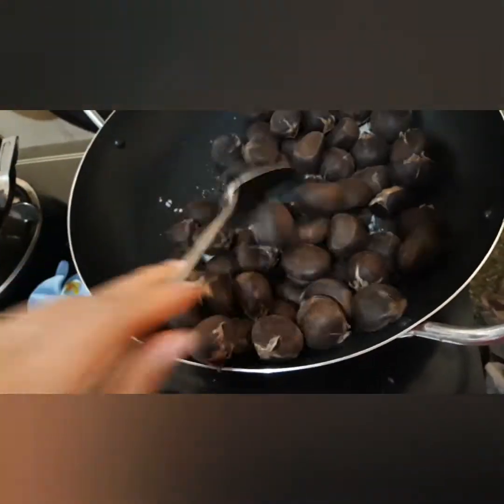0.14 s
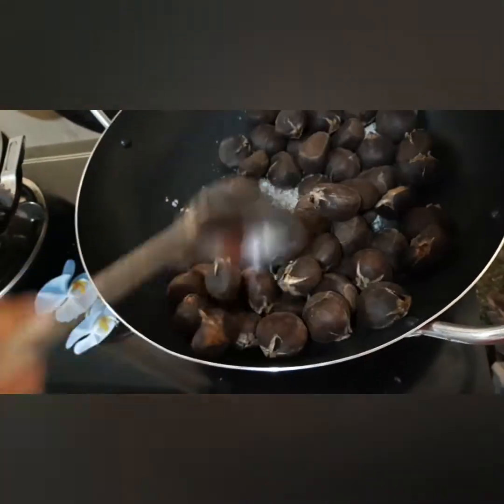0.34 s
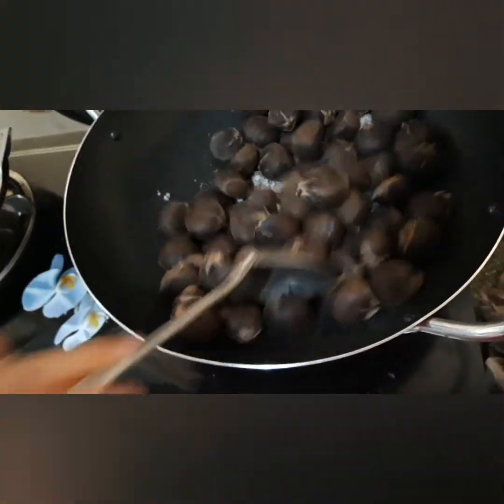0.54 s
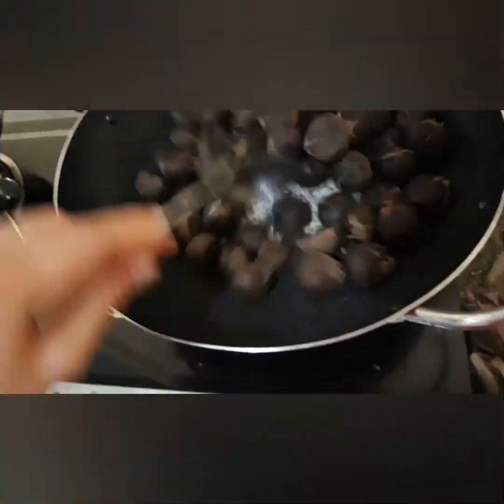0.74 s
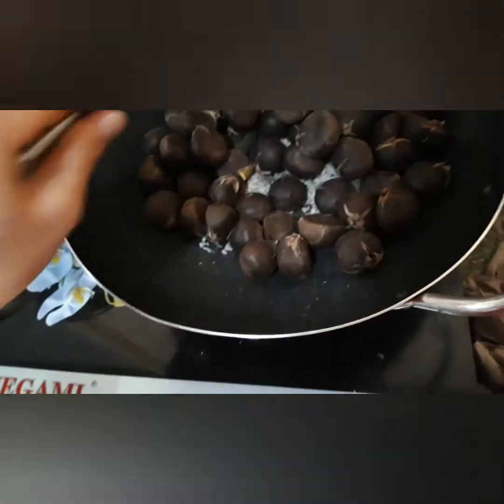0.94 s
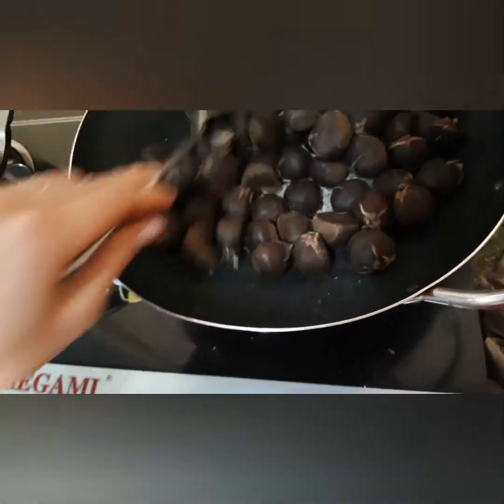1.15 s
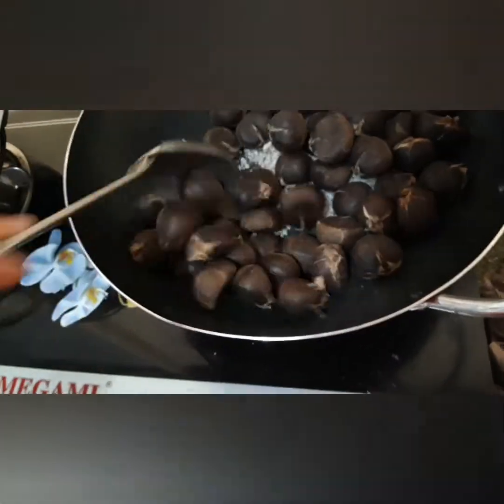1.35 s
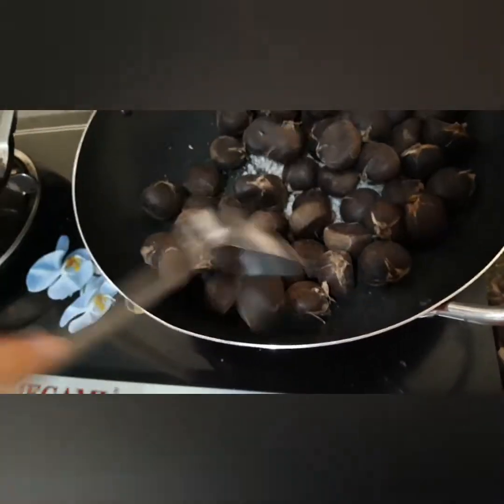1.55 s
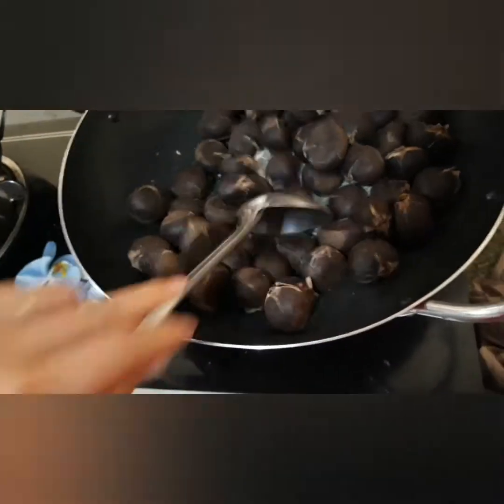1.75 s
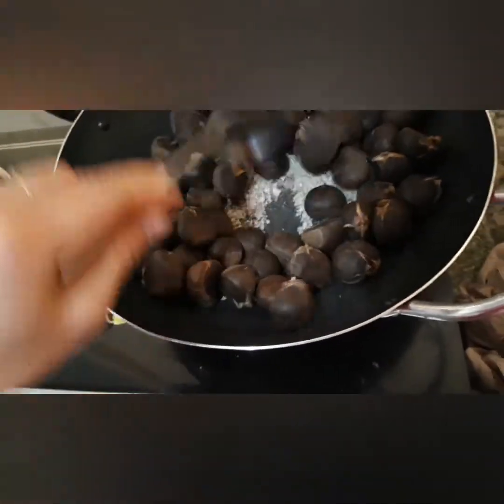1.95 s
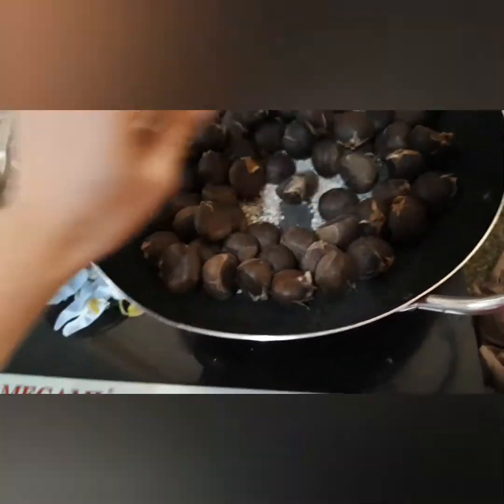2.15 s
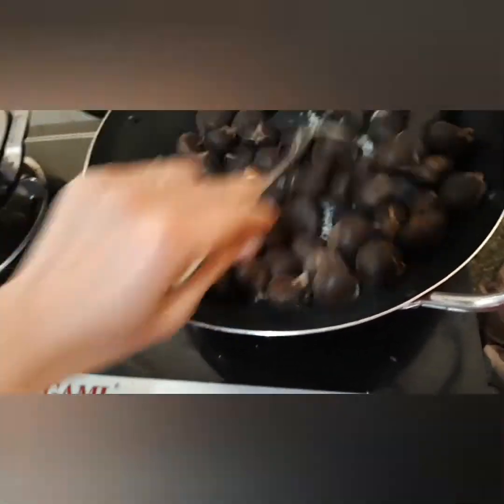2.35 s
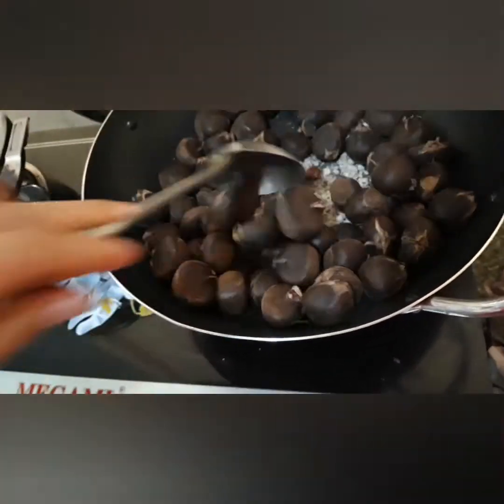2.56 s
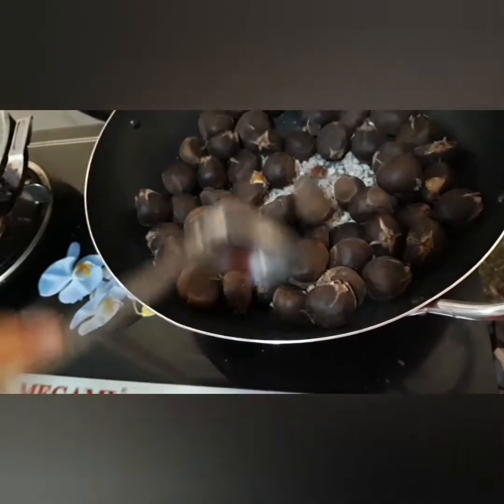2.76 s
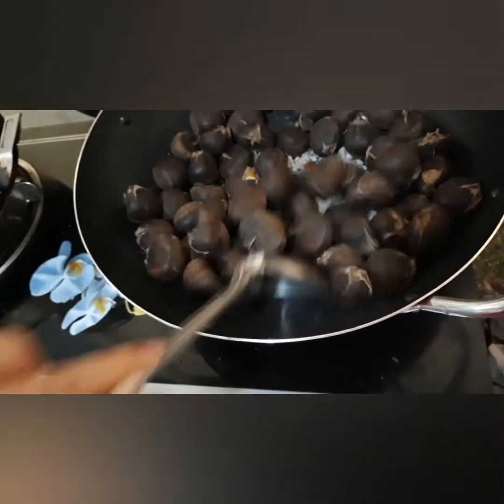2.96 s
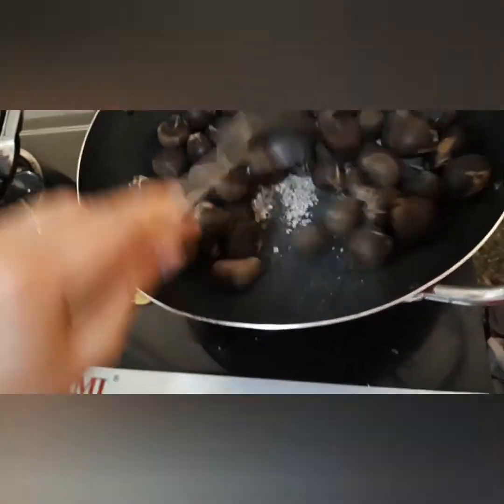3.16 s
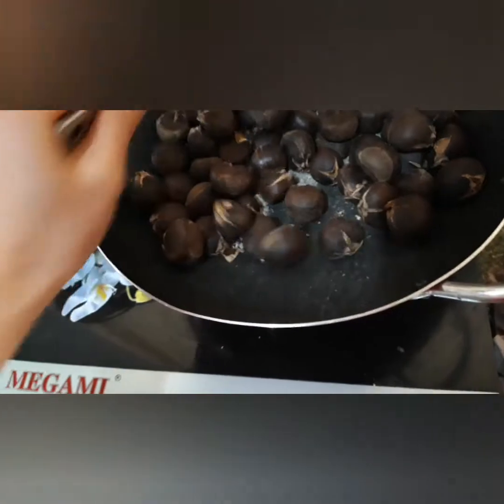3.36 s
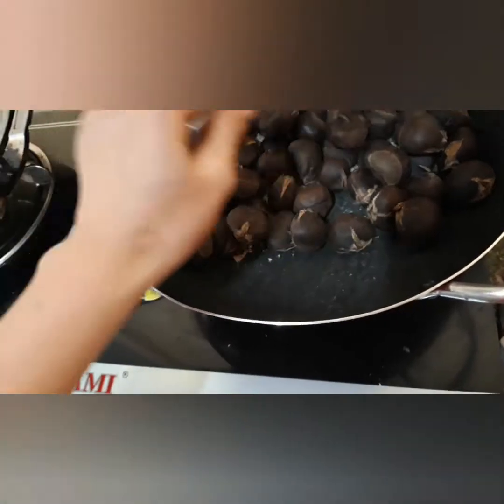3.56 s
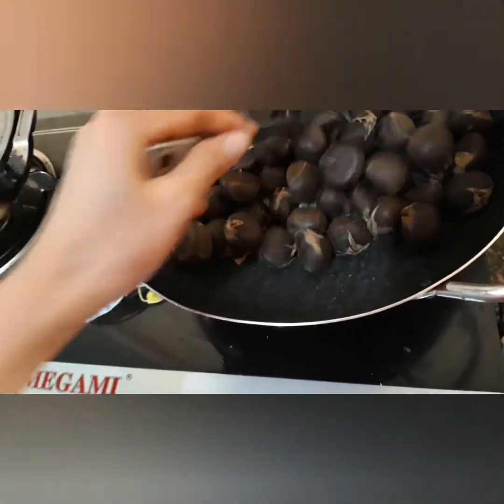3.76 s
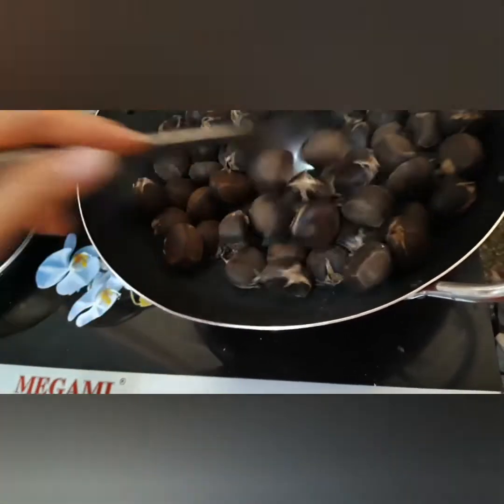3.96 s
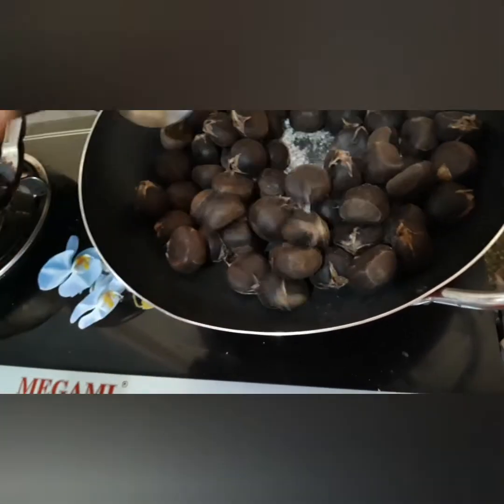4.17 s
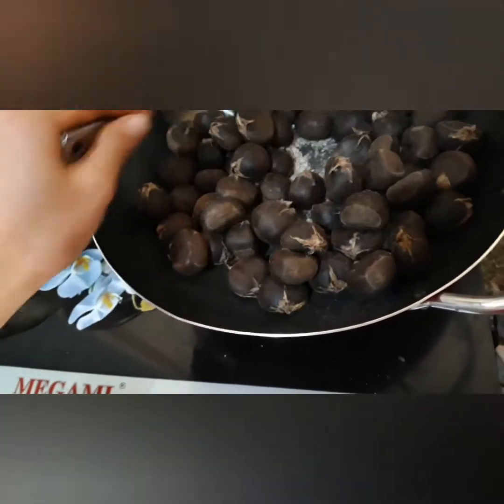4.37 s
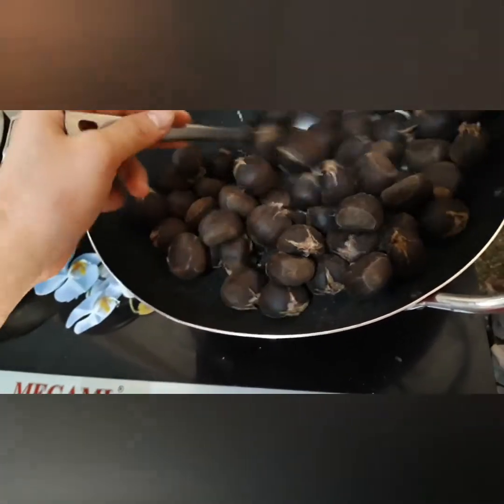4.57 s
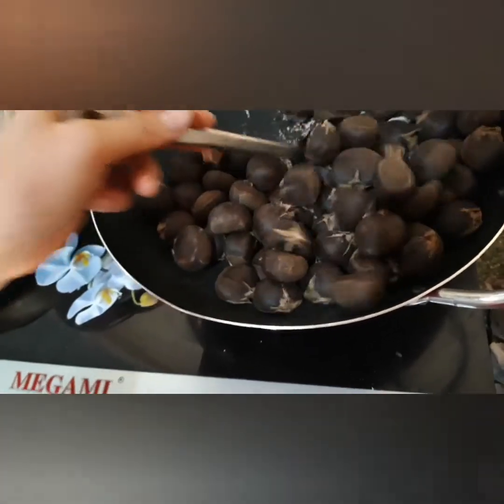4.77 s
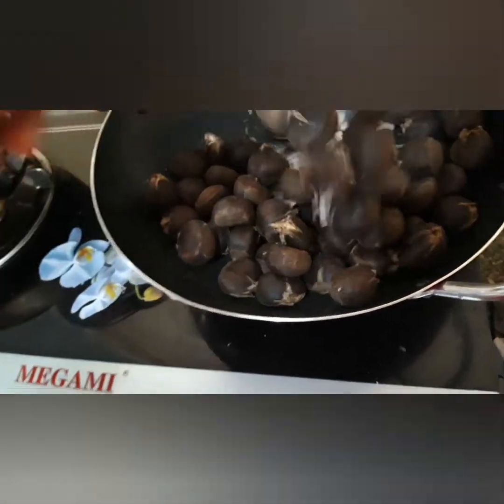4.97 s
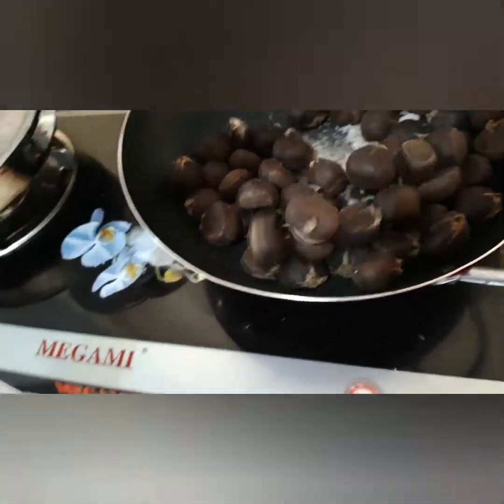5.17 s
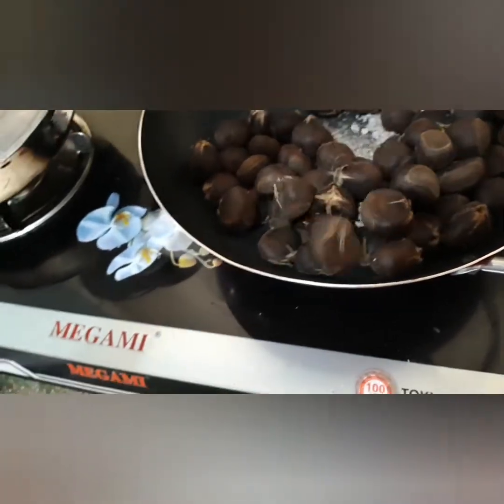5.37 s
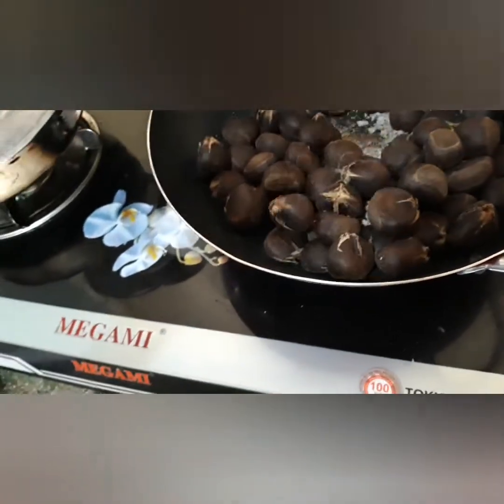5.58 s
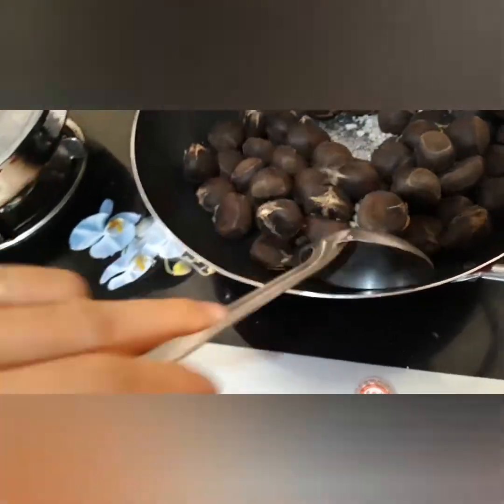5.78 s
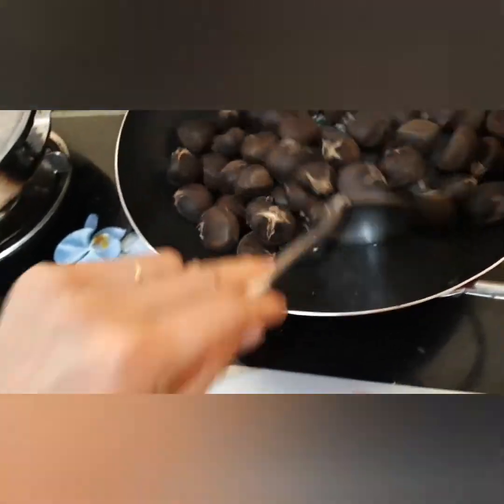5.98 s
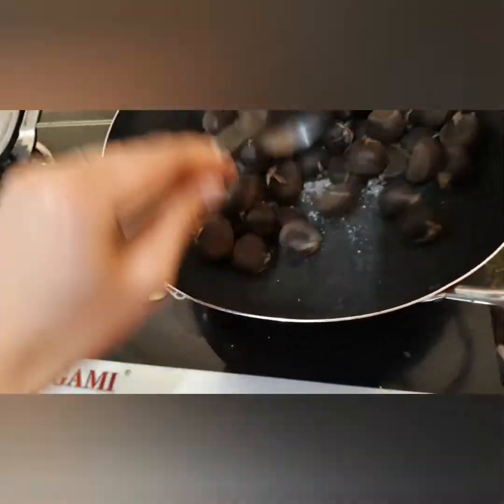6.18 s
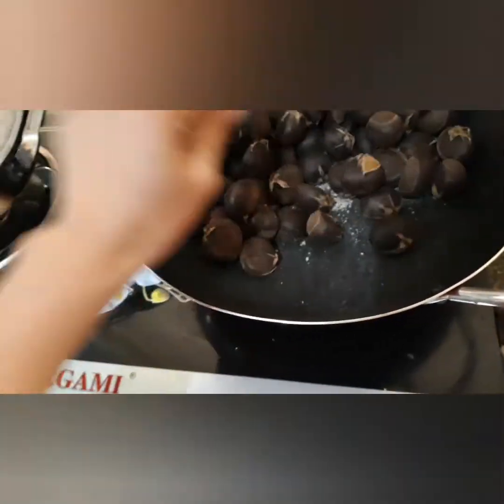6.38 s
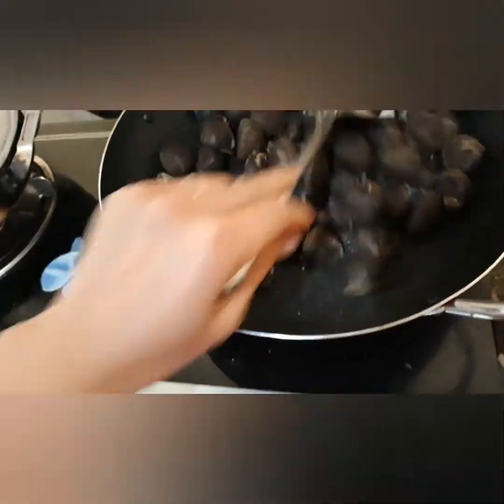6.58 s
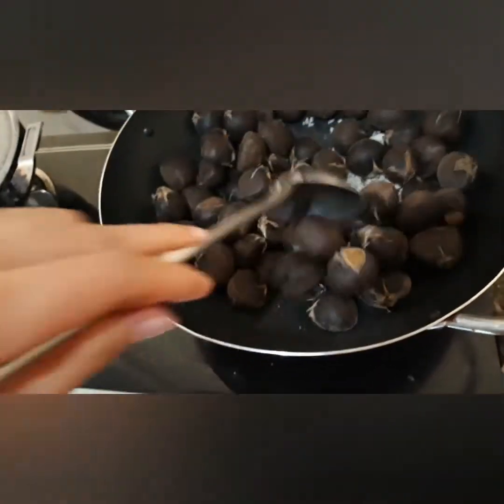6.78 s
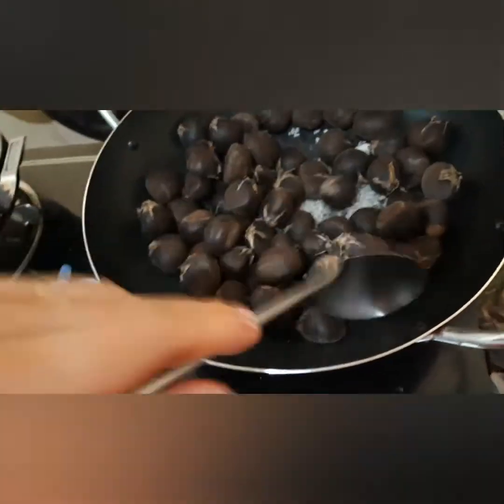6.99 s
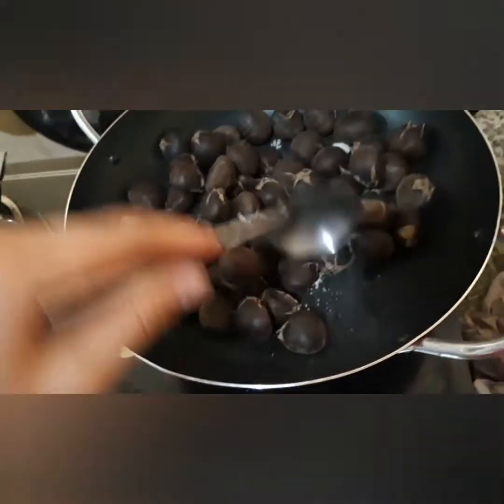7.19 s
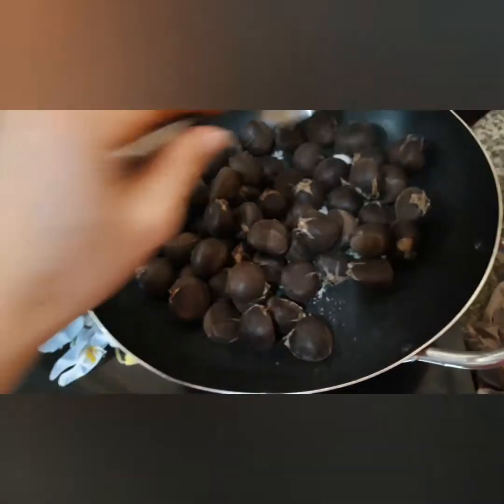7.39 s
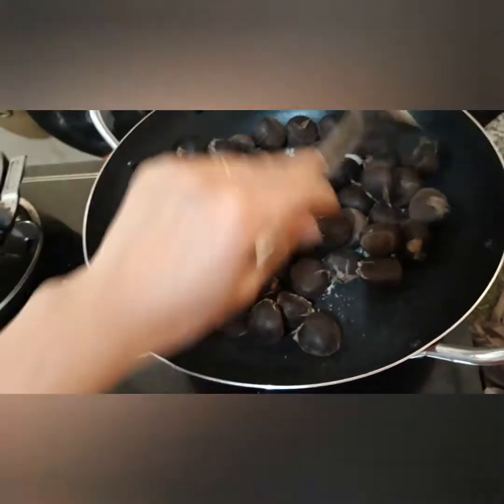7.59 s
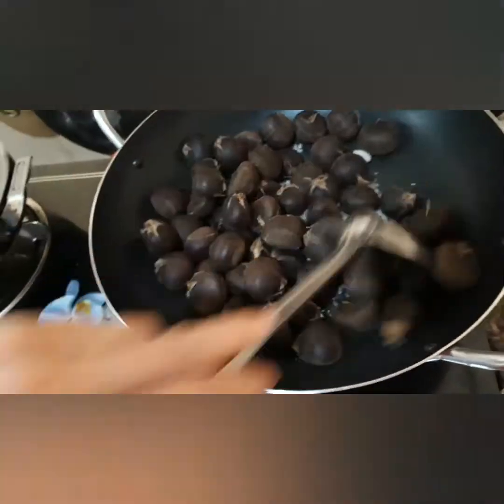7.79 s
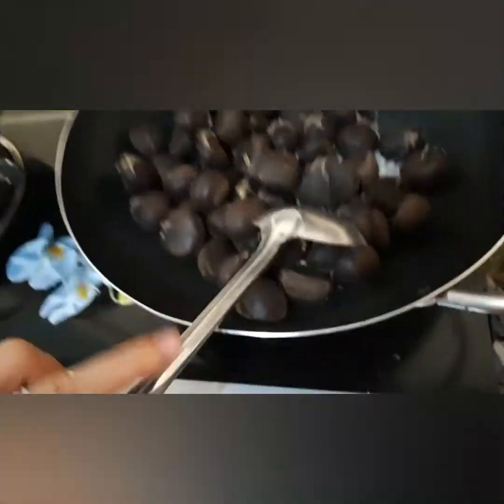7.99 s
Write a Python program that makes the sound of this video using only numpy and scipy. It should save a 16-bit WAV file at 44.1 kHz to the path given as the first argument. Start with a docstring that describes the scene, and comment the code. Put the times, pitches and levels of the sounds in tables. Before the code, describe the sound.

A metal ladle stirs chestnuts and coarse salt in a pan, with gritty scraping strokes, shell clicks, hollow knocks and occasional sharp metallic clangs.

```python
"""Stirring chestnuts in salt

Chestnuts and coarse salt are stirred with a steel ladle in a nonstick pan on a kitchen hob.
Each stroke grinds salt over the pan floor (many tiny random impacts) and sets the nuts tumbling.
Single nuts knock on the pan and shells click on the ladle (short filtered noise bursts).
Now and then the ladle strikes the pan, chatters and makes it ring (noise driving the pan's own tones).
Short squeaks, thin tings, a soft hum, room tone and a small kitchen's tail complete the sound."""
import sys
import numpy as np
from scipy import signal
from scipy.fft import rfft, irfft
from scipy.io import wavfile
from scipy.ndimage import uniform_filter1d

SR = 44100
rng = np.random.default_rng(int(sys.argv[2]) if len(sys.argv) > 2 else 0)


def pcm_store(signal):
    """Save signal as 16-bit PCM."""
    levels = np.round(np.clip(np.atleast_2d(signal), -1, 1) * 32767)
    wavfile.write(sys.argv[1], SR, levels.astype(np.int16).T)


N = 354823
TIME = np.arange(N) / SR
BLOW = TIME[:SR // 3]   # the time axis of one blow, a third of a second


def amp(db):
    """Decibels to gain."""
    return 10 ** (np.asarray(db) / 20)


def rms_one(x):
    """Scale to an average (rms) level of 1."""
    return x / np.sqrt(np.mean(x ** 2) + 1e-20)


def peak_one(x):
    """Scale so that the highest peak is 1."""
    return x / np.abs(x).max()


def add(out, start_s, x):
    """Mix x into out from start_s on."""
    at = max(round(start_s * SR), 0)
    out[at:at + len(x)] += x[:N - at]


def colour(x, spectrum):
    """Filter through the points (pitch_hz, level_db) without smearing sound ahead of time (minimum phase)."""
    size = 4096
    hz, db = np.transpose(spectrum)
    grid = np.maximum(np.fft.rfftfreq(size, 1 / SR), 1)
    gain = amp(np.interp(np.log(grid), np.log(hz), db))
    # folding the cepstrum (the spectrum of the log gain) gives the minimum-phase filter
    cepstrum = irfft(np.log(gain))[:size // 2]
    cepstrum[1:] *= 2
    impulse_response = irfft(np.exp(rfft(cepstrum, size)))
    return signal.fftconvolve(x, impulse_response)[:len(x)]


def resonance(x, hz, width_hz):
    """One resonance, with a gain of about 1 at its top; a wider one dies sooner."""
    r = np.exp(-np.pi * width_hz / SR)
    feed = np.array([1, 0, -1]) * (1 - r * r) / 2
    feedback = [1, -2 * r * np.cos(2 * np.pi * hz / SR), r * r]
    return signal.lfilter(feed, feedback, x)


def burst(t60, hold=0):
    """Noise for countless crowded modes: driven for hold seconds, then falling 60 dB in t60 seconds."""
    decay = amp(-60 * np.maximum(BLOW - hold, 0) / t60)
    return rng.standard_normal(len(BLOW)) * decay


def drift(rate, size=N):
    """Random wander with an rms of 1: straight lines between rate new values a second."""
    knots = rng.standard_normal(int(size / SR * rate) + 2)
    return rms_one(np.interp(TIME[:size] * rate, np.arange(len(knots)), knots))


def contacts(per_s, spread_db):
    """Random impacts of uneven size and either sign, per_s of them a second on average."""
    sizes = amp(spread_db * np.minimum(rng.exponential(1, N), 4))
    signs = rng.choice([-1, 1], N)
    return sizes * signs * (rng.random(N) < per_s / SR)


def scatter(impacts, t60, low_hz, high_hz, relative_width, count=18):
    """Impacts land on many spots, each with a short ring around a pitch of its own."""
    spot = rng.integers(0, count, N)
    out = 0
    for k, hz in enumerate(np.geomspace(low_hz, high_hz, count)):
        broad = rms_one(burst(t60))
        pitched = rms_one(resonance(burst(t60), hz, relative_width * hz))
        ring = pitched * np.sqrt(hz / high_hz) + .5 * broad
        out = out + signal.oaconvolve(impacts * (spot == k), ring)[:N]
    return out


def even(x, span_s):
    """Hold the level near 1 over span_s while the fine grain stays."""
    power = uniform_filter1d(x ** 2, int(span_s * SR))
    # the small added power keeps silences from being blown up
    return x / np.sqrt(np.maximum(power, 0) + np.mean(power) / 1000)


ARCH_DB = 3   # a push is this much weaker at its ends than in its middle
SETTLE_DB, SETTLE_DB_PER_S = -25, 20.5   # a slow trickle starts this far under the push, then fades


def push(start_s, length_s, attack_s, release_db_per_s):
    """Power of one stroke: it swells, arches over the push and dies away as the heap settles."""
    before = np.maximum(start_s - TIME, 0)
    after = np.maximum(TIME - start_s - length_s, 0)
    progress = np.clip((TIME - start_s) / length_s, 0, 1)
    arch = ARCH_DB * (2 * progress - 1) ** 2
    release = np.maximum(-release_db_per_s * after, SETTLE_DB - SETTLE_DB_PER_S * after)
    return amp(np.maximum(release - arch - 20 * before / attack_s, -200)) ** 2


# the ladle pushes through the heap: start_s (full push), length_s, salt_level_db,
# attack_s (time to swell by 20 dB), nuts_db (drive of the nuts above that of the salt)
STROKES = [(0.0, 0.0587, -21, .1, 0), (.55, 0.1707, -24.5, 0.1335, -1), (1.08, 0.1361, -21.5, 0.09, 4),
           (1.35, 0.106, -39.5, 0.01, 9.5), (1.75, 0.0867, -20, 0.1938, 4),
           (2.215, 0.1724, -26.5, 0.1419, 0), (2.85, 0.265, -27, 0.022, -3.5),
           (3.48, 0.354, -34.5, 0.4243, -2), (3.99, .19, -47, .1, 4), (4.37, 0.28, -28.5, 0.21, 0),
           (4.55, .025, -27, .03, -3), (4.83, 0.135, -40, 0.5, 2), (5.09, 0.1077, -41.5, 0.07, 0),
           (5.33, .2, -57, .1, 0), (5.74, .08, -27, .018, 2), (5.85, 0.18, -21.5, 0.055, 3),
           (6.46, 0.1936, -27.5, 0.2054, -1), (7.04, 0.0656, -24, 0.184, -0.5),
           (7.609, 0.2084, -26, 0.082, 6.5)]
RELEASE_DB_PER_S = 111.5   # the grinding dies away after the push
ROLL_ON_DB_PER_S = 85      # the nuts come to rest more slowly


def stirring():
    """How hard the salt and the nuts are moved by all strokes together, both in dB."""
    salt, nuts = 0, 0
    for start_s, length_s, db, attack_s, nuts_db in STROKES:
        salt = salt + amp(db) ** 2 * push(start_s, length_s, attack_s, RELEASE_DB_PER_S)
        nuts = nuts + amp(db + nuts_db) ** 2 * push(start_s, length_s, attack_s, ROLL_ON_DB_PER_S)
    return 10 * np.log10([salt, nuts])


# the tones (modes) the pan rings with: pitch_hz, level_db
PAN_MODES = [(316, -16), (803, -15), (966, -12), (1104, -11), (1424, -5), (1657, -5), (1960, -3),
             (2278, -2), (2665, 1), (2923, -4), (3160, -1), (3285, -2), (3631, 2), (4229, 0), (4641, 1),
             (4875, 4), (5315, 2), (5580, 0), (6140, 2), (6540, 0), (7300, -3)]
PRESSED_WIDTH_HZ = 45   # width of the pan's modes under the ladle


def pressed(x, wander_db=3.5, turns=9):
    """Pressed by the ladle, the pan's modes widen; which of them answer changes as the contact moves."""
    out = 0
    for hz, db in PAN_MODES:
        level = amp(db + wander_db * drift(turns, len(x)))
        out = out + level * resonance(x, hz, PRESSED_WIDTH_HZ)
    return out


PAN_T60_S = .4   # time to fall 60 dB, up to 1 kHz; higher modes die sooner


def pan_ring(force):
    """The pan's modes answer a force; 1 ms of force at rms 1 lifts a 0 dB mode to a height of about 1."""
    response = 0
    for hz, db in PAN_MODES:
        decay_db = -60 * BLOW / PAN_T60_S * np.sqrt(max(hz / 1000, 1))
        tone = np.sin(2 * np.pi * hz * BLOW) * rng.choice([-1, 1])
        response = response + amp(db + decay_db) * tone
    return signal.oaconvolve(force, response)[:N] / np.sqrt(SR / 1000)


# tone colour of the grinding salt: pitch_hz, level_db
GRIND = [(530, -35), (1000, -11.5), (1400, -13.5), (1700, -10), (2200, -11.5), (2750, -8.5), (3100, -1.5),
         (4750, 0), (6600, -2), (7500, -7.5), (9400, -4.5), (9900, -17), (13000, -13.5), (16000, -15.5)]


def grinding(level_db, per_s=4500, crowding=.58, clump_db=1.5, grit_db=1.6, grit_per_s=600,
             modes_db=-10, gain_db=-.7):
    """Salt cracks and slips in tiny jerks and rubs the pan's modes; a harder stroke moves more grains."""
    rate = per_s * amp(crowding * (level_db - level_db.max()))
    impacts = contacts(rate, spread_db=3.5)
    grains = colour(scatter(impacts, t60=0.034, low_hz=1502, high_hz=13096, relative_width=0.22), GRIND)
    # the grain is uneven on two scales, clumps and finer grit
    grains = grains * amp(clump_db * drift(70) + grit_db * drift(grit_per_s))
    rubbed = grains + amp(modes_db) * pressed(grains)
    return amp(level_db + gain_db) * even(rubbed, span_s=0.07)


# tone colour of shells touching: pitch_hz, level_db
CLICK = [(300, -24), (1000, -17), (2200, -11), (3300, 1.5), (6000, 2), (9000, -2), (10500, -8.5),
         (16000, -21)]


def shells(stir_db, per_s=70, follow=0.741, gain_db=-20):
    """Dry shells tick against each other; the ticks stand out as the heap settles."""
    impacts = contacts(per_s, spread_db=3.0)
    ticks = scatter(impacts, t60=0.0206, low_hz=2570, high_hz=11400, relative_width=0.28)
    # follow below 1: the ticks rise and fall less steeply than the salt
    return amp(follow * stir_db + gain_db) * rms_one(colour(ticks, CLICK))


# tone colour of the tumbling nuts: pitch_hz, level_db
TUMBLE = [(25, -46), (70, -7), (130, -10), (220, -5.5), (330, 1.5), (620, -1.5), (800, 3.5), (1100, -9.5),
          (1500, -20), (3000, -20.5)]


def tumbling(stir_db, per_s=450, crowding=.35, follow=0.6532, gain_db=-27.0):
    """Nuts roll over each other and patter dully on the pan floor; they swell less steeply than the salt."""
    rate = per_s * amp(crowding * (stir_db - stir_db.max()))
    impacts = contacts(rate, spread_db=2.5)
    bumps = scatter(impacts, t60=0.074, low_hz=90.0, high_hz=1415, relative_width=0.607)
    return amp(follow * stir_db + gain_db) * even(colour(bumps, TUMBLE), span_s=0.072)


# broad resonances of ladle and pan that colour every hard contact: pitch_hz, width_hz, level_db
BODY = [(1129, 142, 7), (2568, 164, -1), (8585, 180, -6.5)]


def body(x):
    """The metal adds a few broad bands of the contact noise to itself."""
    return x + sum(amp(db) * resonance(x, hz, width_hz) for hz, width_hz, db in BODY)


# the steady background of the room: pitch_hz, level_db
ROOM_TONE = [(30, -2.5), (90, 4.5), (200, -2.5), (450, 18), (900, 0), (1500, -19), (4500, -14.5),
             (16000, -27)]


def room_tone(level_db=-64.5):
    """A steady, faint background: coloured noise."""
    return amp(level_db) * rms_one(colour(rng.standard_normal(N), ROOM_TONE))


# a nut drops on the pan: start_s, level_db (peak, before gain), pitch_hz (of the knock),
# click_db (click of its shell, before gain)
KNOCKS = [(.392, -30, 368, -32), (.982, -29.5, 822, -21), (1.318, -27, 800, -32), (1.503, -28, 490, -34.5),
          (1.552, -19, 500, -20.5), (1.609, -23.5, 600, -14), (2.157, -22, 800, -29.5),
          (2.18, -25.5, 828, -27), (3.324, -32.5, 503, -28), (3.383, -27, 907, -23.5),
          (3.517, -29, 1500, -24), (4.191, -25, 946, -28.5), (5.008, -29, 520, -33), (5.399, -32, 400, -31),
          (5.467, -34, 472, -34), (6.377, -28, 816, -19.5), (6.415, -26.5, 875, -12),
          (6.883, -21.5, 787, -18), (6.951, -24, 786, -28), (7.478, -23.5, 740, -30.5),
          (7.5245, -12, 785, -15), (7.577, -19, 480, -9)]
# tone colour of the pan floor under a falling nut: pitch_hz, level_db
KNOCK = [(100, -4), (300, 3.5), (450, 2.5), (550, -5), (780, 2.5), (1150, -6.5), (2500, -11)]


def knocks(t60=0.055, tail_db=0.5, width_hz=450, gain_db=2):
    """A falling nut is one soft push: a short hollow knock, then the pan floor shivers briefly."""
    out = np.zeros(N)
    for start_s, db, hz, _ in KNOCKS:
        shiver = burst(t60)
        force = (BLOW == 0) + amp(tail_db) * shiver / np.linalg.norm(shiver)
        knock = colour(resonance(force, hz, width_hz), KNOCK)
        add(out, start_s, amp(db + gain_db) * peak_one(knock))
    return out


# the ladle catches a shell or a salt lump: start_s, level_db (peak, before gain)
CLICKS = [(.751, -12.5), (1.203, -6), (1.372, -21), (1.586, -18), (2.114, -20.5), (2.246, -13),
          (2.319, -6.5), (2.57, -26), (2.67, -24.5), (2.78, -40), (3.086, -7), (3.207, -20), (3.549, -11),
          (3.664, -15), (3.727, -12), (3.936, -19), (3.973, -20.5), (4.1, -19), (4.378, -9), (4.894, -21),
          (5.082, -22.5), (5.128, -24.5), (5.244, -29), (5.547, -33), (6.904, -17), (7.1124, -7),
          (7.608, -6), (7.647, -8)]
SHELL_T60_S = .03
SHELL_GIVE_S = 0.001216   # the ring builds up just after the crack


def clicks(tail_t60=0.11, tail_db=-17, crack_t60=0.00814, crack_db=-7, gain_db=-0.5):
    """A hard contact: a sharp, bright, very short crack, and a brief ring of the ladle's bowl."""
    out = np.zeros(N)
    shell_clicks = [(start_s, click_db) for start_s, _, _, click_db in KNOCKS]
    for start_s, db in CLICKS + shell_clicks:
        ring = colour(burst(SHELL_T60_S) + amp(tail_db) * burst(tail_t60), CLICK)
        build_up = -np.expm1(-BLOW / SHELL_GIVE_S)
        # differences between neighbouring samples favour the treble
        crack = amp(crack_db) * np.diff(burst(crack_t60), prepend=0) / 2
        add(out, start_s, amp(db + gain_db) * peak_one(ring * build_up + crack))
    return out


# the ladle springs free and tings: start_s, level_db (added to each mode's level)
TINGS = [(.982, -38), (1.42, -37), (3.335, -37), (3.975, -39), (4.97, -38)]
# what the ladle rings with once it is clear of the heap: pitch_hz, level_db
LADLE_MODES = [(1908, -19), (4615, -8), (6345, -5), (8345, -11)]


def tings(t60=.22, scatter_db=1.5):
    """The freed ladle rings thinly, with a new balance of its modes each time."""
    out = np.zeros(N)
    for start_s, db in TINGS:
        for hz, mode_db in LADLE_MODES:
            level_db = db + mode_db + scatter_db * rng.standard_normal()
            tone = np.sin(2 * np.pi * hz * BLOW)
            add(out, start_s, amp(level_db - 60 * BLOW / t60) * tone)
    return out


# the ladle strikes the pan: start_s, level_db (peak, before gain), pitch_hz (brightest part),
# width_hz (of the clang), thud_db (peak of the thud), chatter_s, ring_db (ring relative to level_db)
STRIKES = [(1.6879, -3.5, 3740, 3800, -55, 0.0035, -9.5), (1.7615, -1.5, 4970, 3800, -23, 0.0059, -8.5),
           (1.7809, -10.5, 6500, 3800, -42, 0.0116, 3), (2.819, -1, 5510, 3800, -18, 0.0094, -4),
           (4.2367, -8.5, 3930, 3800, -67, 0.0035, -16), (4.2592, -.5, 4414, 1600, -65, 0.0159, -2.5),
           (4.279, -3.5, 3950, 2000, -74, 0.0112, 7), (5.6957, -1.5, 6240, 2400, -30, 0.0106, 1),
           (5.7232, 0, 6170, 2000, -55.5, 0.0085, -2)]
# tone colour of steel on the pan: pitch_hz, level_db
STEEL = [(100, -22.5), (700, 11), (2200, 0.5), (3500, 6), (6500, 1), (9000, 1.5), (10500, -5), (16000, 2)]
STEEL_TAIL_T60_S = .2


def strikes(t60=0.0258, tail_db=-19, gain_db=-0.5, ring_db=-32, clang_db=-3, jolt_db=.8):
    """Steel chatters unevenly on the pan and wakes a clang of its modes, then the pan rings on."""
    out, force = np.zeros(N), np.zeros(N)
    for start_s, db, hz, width_hz, _, chatter_s, own_ring_db in STRIKES:
        chatter = burst(t60, hold=chatter_s) * amp(jolt_db * drift(500)[:len(BLOW)])
        steel = chatter + amp(tail_db) * burst(STEEL_TAIL_T60_S)
        contact = colour(resonance(steel, hz, width_hz), STEEL)
        clang = amp(clang_db) * pressed(contact, wander_db=3)
        add(out, start_s, amp(db + gain_db) * peak_one(contact + clang))
        # the same energy in every chatter, so that only the levels set the ring
        drive = np.sqrt(SR / 1000) * chatter / np.linalg.norm(chatter)
        add(force, start_s, amp(db + own_ring_db) * drive)
    return out + amp(ring_db) * pan_ring(force)


def thuds(t60=0.022):
    """Strikes shove the whole pan against the hob: a low noise burst, very faint for most of them."""
    out = np.zeros(N)
    for start_s, _, _, _, thud_db, _, _ in STRIKES:
        shove = colour(burst(t60), [(20, -16), (70, -4), (250, -2), (500, -7), (2000, -40)])
        add(out, start_s, amp(thud_db) * peak_one(shove))
    return out


# the ladle's edge squeaks over bare pan: start_s, length_s, level_db (before fading in and out), pitch_hz
JUDDERS = [(4.368, .024, -21, 6780), (4.394, .04, -30, 3120), (4.545, .035, -28, 3540),
           (4.548, .035, -26, 5590), (4.618, .05, -30, 3630), (4.62, .065, -36, 14550),
           (5.837, .027, -30, 1407)]


def judders(waver=.04, rough_db=4, turns=600):
    """Steel sticks and slips: a short, narrow squeak that wavers and stutters."""
    out = np.zeros(N)
    for start_s, length_s, db, hz in JUDDERS:
        size = int(length_s * SR)
        pitch = hz * (1 + waver * drift(turns, size))
        squeak = np.sin(2 * np.pi * np.cumsum(pitch) / SR)
        slips = squeak * amp(rough_db * drift(turns, size))
        add(out, start_s, amp(db) * np.sqrt(np.hanning(size)) * rms_one(slips))
    return out


# two low modes of the pan left humming: pitch_hz, level_db (at the start), t60_s (time to fall 60 dB)
HUM = [(969, -55, .85), (1658, -61, .5)]
HUM_S = 5.4   # when the hum starts


def hum():
    """The undamped pan sings softly: two fading sine tones."""
    out = np.zeros(N)
    for hz, db, t60 in HUM:
        add(out, HUM_S, amp(db - 60 * TIME / t60) * np.sin(2 * np.pi * hz * TIME))
    return out


KITCHEN_T60_S, KITCHEN_DB = 0.266, -9


def kitchen(x):
    """A small room's diffuse tail, thin in the bass: fading noise that starts 5 ms after the sound."""
    noise = burst(KITCHEN_T60_S) * (BLOW > .005)
    tail = colour(noise, [(90, -19.5), (300, 4.5), (5000, -3), (15000, 2)])
    return amp(KITCHEN_DB) * signal.oaconvolve(x, tail / np.linalg.norm(tail))[:N]


def scene():
    """Everything happens in the one pan, straight ahead: both channels are alike."""
    stir_db, nuts_db = stirring()
    hard = amp(-1) * body(grinding(stir_db) + shells(stir_db) + clicks() + judders())
    soft = tumbling(nuts_db) + knocks()
    ringing = pan_ring(amp(-42.5) * hard + amp(-36.0) * soft)
    pan = hard + soft + ringing + strikes() + thuds() + tings() + hum()
    return np.tile(pan + kitchen(pan) + room_tone(), (2, 1))


CUTOFF_HZ = 15850


def record(dry):
    """Soft sounds are lifted by about a fifth, the highest peaks are rounded and the top is cut."""
    rounded = 1.429 * np.tanh(dry / 1.1792)
    low_pass = signal.ellip(10, .2, 70, CUTOFF_HZ, fs=SR, output="sos")
    return signal.sosfilt(low_pass, rounded)


dry = scene()
out = record(dry)
pcm_store(out)
```